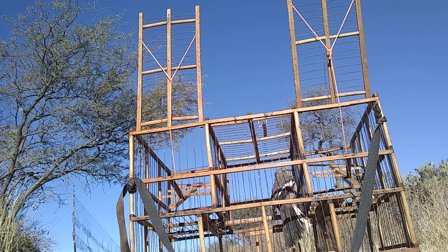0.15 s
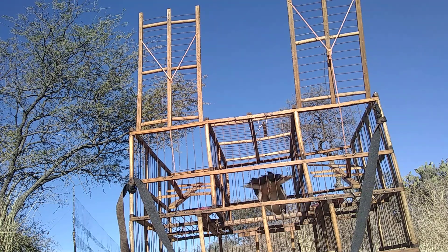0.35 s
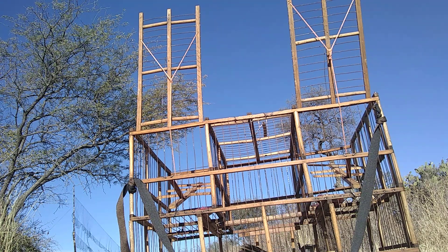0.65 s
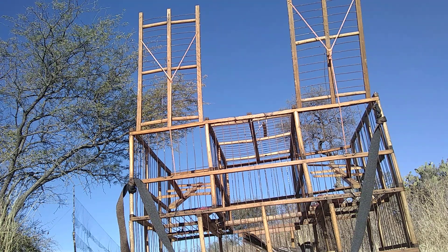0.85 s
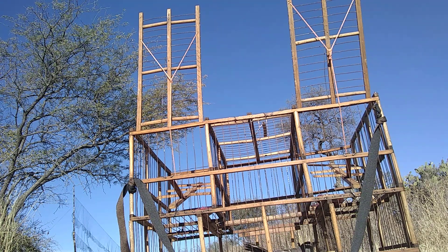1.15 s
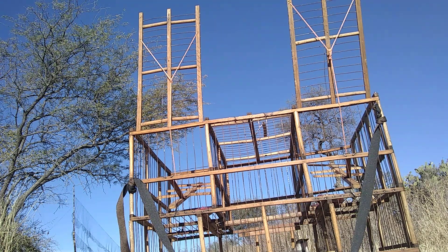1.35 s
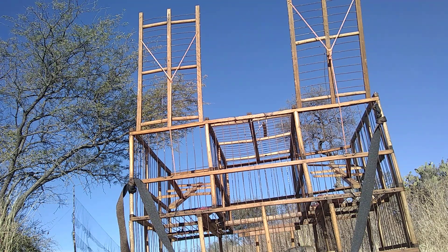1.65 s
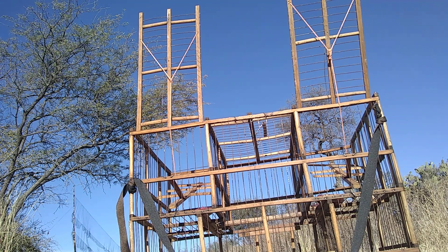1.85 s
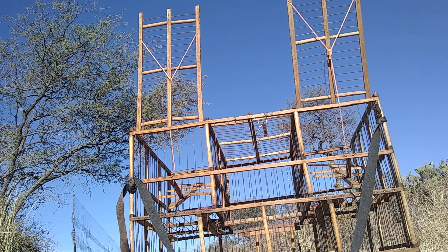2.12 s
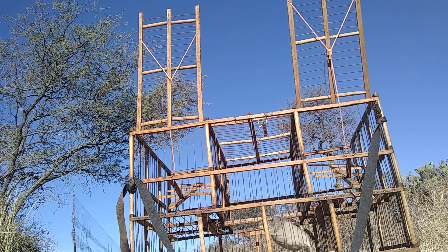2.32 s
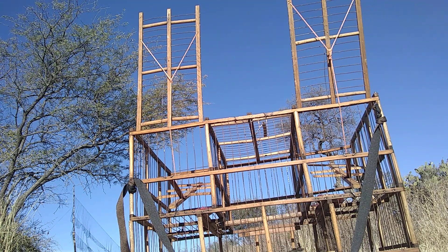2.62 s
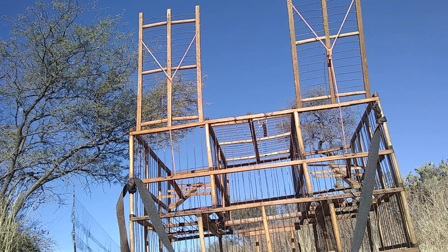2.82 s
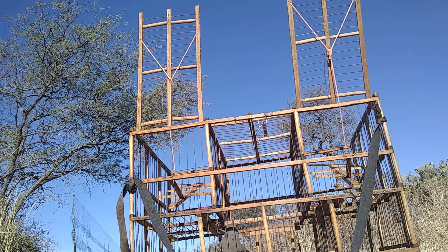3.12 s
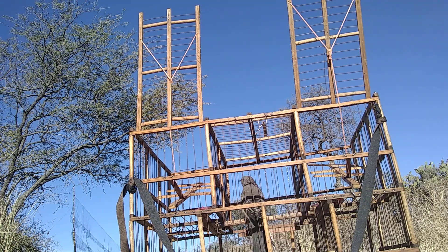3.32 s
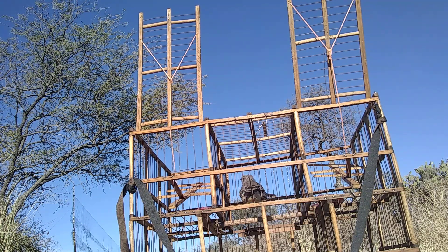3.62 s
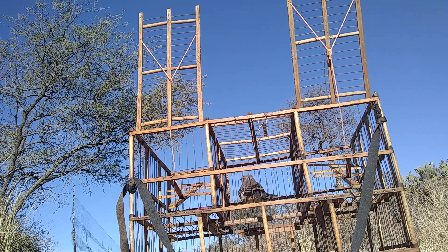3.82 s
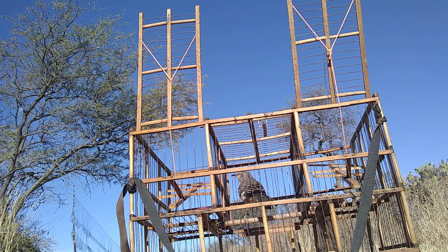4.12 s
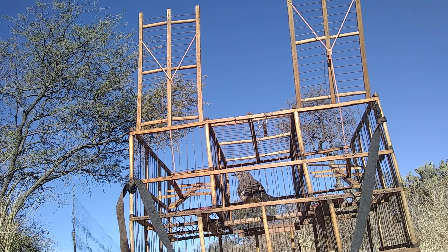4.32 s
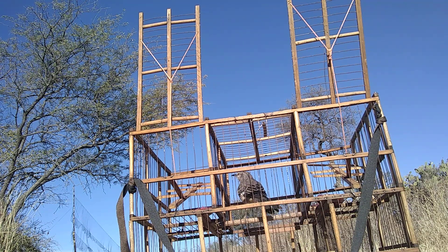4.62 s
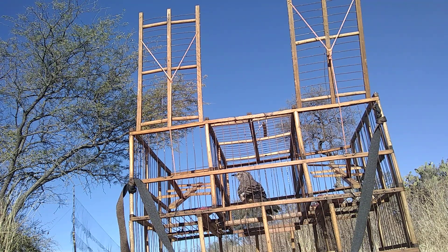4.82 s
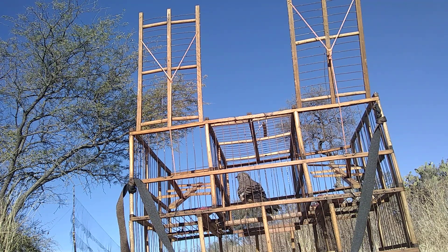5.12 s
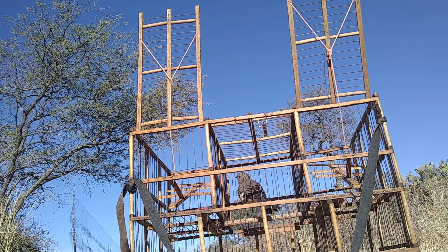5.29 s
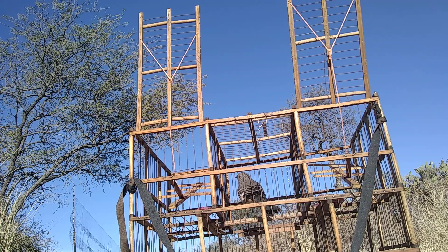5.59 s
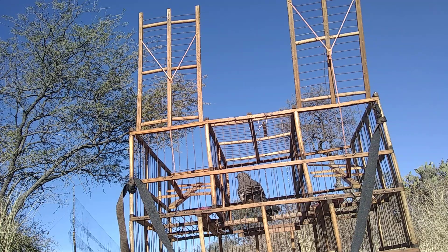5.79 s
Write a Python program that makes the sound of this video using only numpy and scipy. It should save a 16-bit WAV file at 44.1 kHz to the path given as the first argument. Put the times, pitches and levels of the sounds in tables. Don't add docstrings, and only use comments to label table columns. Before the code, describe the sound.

Outdoors, a near bird chirps, warbles and trills in repeated phrases; afterwards a fainter bird replies from the right over a faint hush.

```python
import sys
import numpy as np
from scipy import signal
from scipy.fft import rfft, irfft, next_fast_len
from scipy.io import wavfile
from scipy.ndimage import uniform_filter1d, map_coordinates

SR = 44100
rng = np.random.default_rng(int(sys.argv[2]) if len(sys.argv) > 2 else 0)


def gain_from_db(level_db):
    decades = np.asarray(level_db, float) / 20
    return 10 ** decades


def log_audio(samples):
    frames = np.atleast_2d(samples).T
    limited = np.clip(frames, -1, 1)
    pcm = np.round(limited * 32767).astype(np.int16)
    wavfile.write(sys.argv[1], SR, pcm)


N = 262395

# (frequency [Hz], density [dB per Hz])
HUSH_COLOUR = [(25, -34.5), (55, -8), (90, 6.5), (150, 1.5), (400, -0.5), (700, -12.5), (1500, -19.5),
               (3000, -20.5), (6000, -21), (12000, -26), (14100, -28), (15000, -31.5)]
# (time [s], level [dB])
HUSH_LEVEL = [(0, -55), (2, -55), (3.5, -55), (4.5, -56.5), (6, -58)]
# (frequency [Hz], likeness [0-1])
HUSH_SHARED = [(30, .9), (125, .8), (250, .8), (500, .57), (1200, .25), (2500, 0)]

NEAR_TONES = [-22.5, -36, -51, -40, -49.5]
FAR_TONES = [-41, -36.5, -45.5, -35.5, -60]
LOW_TONES = [-44, -40]
# (frequency [Hz], gain [dB])
OPEN_THROAT = [(1000, 0), (9000, 0)]
# (frequency [Hz], gain [dB])
WARBLE_THROAT = [(4000, 0), (6000, 6), (6900, -1)]
# (frequency [Hz], gain [dB])
TRILL_THROAT = [(2300, 11.5), (2900, 4.5), (3500, -5), (4800, 4.5), (5500, -8.5)]
# (frequency [Hz], gain [dB])
FAR_THROAT = [(4000, 0), (6000, 2), (7500, 3), (10000, 3.5), (12500, -21)]
# (frequency [Hz], level [dB])
RASP_COLOUR = [(500, -20), (900, -11.5), (1500, 0), (2500, 9.5), (4000, -12.5), (8000, -16.5),
               (12600, -23.5), (13900, -5.5)]
# (frequency [Hz], level [dB])
SNAP_COLOUR = [(700, -23.5), (1500, -2), (3000, 10), (5500, -1), (7000, -11.5), (11000, -20.5)]
# (frequency [Hz], level [dB])
PUFF_COLOUR = [(500, -15), (900, -2.5), (1500, -5), (2600, -12), (3500, -31)]

# (crest time [s], level [dB], flick level [dB], tail gain [dB])
CHIPS = [
    (.025, -27.5, -28, 1.5),
    (0.323, -21, -29.5, -6.5),
    (0.631, -33.5, -27.5, 8.5),
    (0.9675, -24.5, -28, 0),
]
# (time from chip start [s], pitch [Hz], level below the start [dB])
CHIP_FLICK = [(-.012, 1104, -47.5), (-.006, 1910, -8.5), (-.003, 2390, -9.5)]
# (time after crest [s], pitch [Hz], level [dB])
CHIP_DROP = [(0, 3140, 4), (.004, 2820, -2.5), (0.011, 2720, 3.5), (0.018, 2630, -7), (0.024, 2600, -20),
             (0.027, 2360, -26)]
# (first crest [s], glide start [s], end [s], first beat [ms], growth of each beat [ratio])
WARBLES = [(.0785, .188, .240, 7., 1.08), (.3835, .494, .552, 7.3, 1.07), (.699, .803, .866, 6.5, 1.12)]
# (loudest beat [dB], glide [dB], break between beats [dB], overtone gain [dB], start swell [dB])
WARBLE_VOICES = [(-36, -32.5, 6.5, -6.5, -10.5), (-28.5, -29.5, 10, 4, -23.5), (-26, -26, 10, -9.5, -25.5)]
# (share of its length [0-1], pitch [Hz], level [dB])
WARBLE_GLIDE = [(0, 3287, -1.5), (.11, 3306, -1.5), (0.269, 2988, -0.2), (.55, 2677, -0.8),
                (0.798, 2470, -3), (.95, 2515, -10), (1, 2267, -17.5)]
# (time [s], level [dB])
HOPS = [(0.606, -66), (0.944, -61), (1.585, -66), (3.225, -71), (3.399, -68.5)]
# (frequency [Hz], width [Hz], level [dB])
CAGE_RINGS = [(1610, 270, 11), (3180, 730, 9.5), (5250, 1400, 3)]
# (start [s], end [s], pitch [Hz], level [dB])
LOW_NOTES = [(1.831, 1.891, 1793, -22.5), (2.097, 2.155, 1780, -19), (2.387, 2.447, 1763, -22.5),
             (2.712, 2.775, 1800, -22.5)]
# (start [s], end [s], pitch [Hz], level [dB])
HIGH_NOTES = [(1.822, 1.86, 2080, -34.5), (2.096, 2.141, 2060, -24), (2.385, 2.443, 2065, -24),
              (2.716, 2.747, 2073, -23.5)]
# (time [s], level [dB])
CLIMBS = [(2.146, -42), (2.442, -41), (2.772, -35)]
# (time from its start [s], pitch [Hz], level [dB])
CLIMB_SHAPE = [(0, 2158, -7.5), (.009, 2653, -5.5), (0.018, 2880, -4.2)]
# (first crest [s], end [s], first beat [ms], growth of each beat [ratio], held beat [ms])
TRILLS = [(1.9015, 2.048, 5.4, 1.48, 20.9), (2.168, 2.320, 5.5, 1.45, 20.),
          (2.4607, 2.643, 6.5, 1.32, 20.6), (2.7927, 2.971, 6.7, 1.38, 20.3)]
# (top pitch [Hz], loudest beat [dB], overtone gain [dB], tiring [dB])
TRILL_VOICES = [(3590, -17.5, -4.5, -1), (3620, -18, -3, -2), (3550, -21.5, -14, 1),
                (3380, -18.5, -4, -5.5)]
# (time [s], lag of the right port [ms])
NEAR_LAG = [(0, 0.0088), (.1, 0.059), (.7, 0.059), (2.1, .08), (2.4, 0.073), (2.55, -0.029), (2.9, -0.051)]

# (crest time [s], foot pitch [Hz], top pitch [Hz], level [dB])
FAR_FLIPS = [(3.639, 2735, 3620, -54.5), (3.673, 2870, 3250, -50), (4.423, 3070, 3560, -34),
             (4.9573, 2800, 3500, -42.5), (4.968, 2730, 3070, -46)]
# (start [s], end [s], from pitch [Hz], to pitch [Hz], level [dB])
FAR_RISES = [(3.677, 3.708, 2880, 2980, -37), (3.803, 3.837, 2390, 2350, -47.5),
             (3.845, 3.897, 2450, 3100, -33.5), (4.055, 4.077, 2750, 2910, -34),
             (4.285, 4.326, 2400, 2943, -37.5), (4.368, 4.417, 2380, 3100, -31.5),
             (4.452, 4.472, 2800, 3050, -47), (4.938, 4.966, 2650, 2860, -37.5)]
# (start [s], end [s], from pitch [Hz], to pitch [Hz], level [dB])
FAR_FALLS = [(3.648, 3.675, 2740, 2595, -44), (3.899, 3.966, 3000, 2220, -39.5),
             (4.069, 4.099, 2720, 1990, -37), (4.155, 4.193, 2360, 2290, -32),
             (4.321, 4.357, 2450, 1760, -36.5), (4.528, 4.576, 1817, 1730, -43),
             (4.567, 4.600, 2400, 1910, -35), (4.610, 4.735, 2680, 2480, -34),
             (4.765, 4.785, 2500, 2490, -58), (4.810, 4.878, 2210, 1940, -37),
             (4.877, 4.885, 1930, 1690, -44), (4.960, 4.964, 2600, 2440, -37),
             (4.975, 5.084, 2350, 1802, -38)]


def evened(x):
    return x / np.sqrt(np.mean(x ** 2) + 1e-20)


def read(points, hz):
    f, value = np.transpose(points)
    return np.interp(np.log(hz + 1), np.log(f + 1), value)


def along(points):
    return np.interp(np.arange(N) / SR, *np.transpose(points))


def coloured(x, points):
    gain = gain_from_db(read(points, np.fft.rfftfreq(x.shape[-1], 1 / SR)))
    return irfft(rfft(x) * gain, x.shape[-1])


def air(colour):
    return evened(coloured(rng.standard_normal(N), colour))


def add(mix, s, sound):
    part = mix[max(round(s * SR), 0):][:len(sound)]
    part += sound[:len(part)]


def hush():
    frames, hz = N // 256 + 5, np.fft.rfftfreq(1024, 1 / SR)
    a, b, c, d, patches = rng.standard_normal((frames, 513, 5)).T
    patches = uniform_filter1d(patches, size=10, axis=0)
    patches = evened(uniform_filter1d(patches, size=16, axis=1))
    same = read(HUSH_SHARED, hz)[:, None]
    left = a + 1j * b
    right = same * left + np.sqrt(1 - same ** 2) * (c + 1j * d)
    z = np.array([left, right]) * gain_from_db(read(HUSH_COLOUR, hz)[:, None] + 1.2 * patches)
    noise = signal.istft(z, nperseg=1024, noverlap=768)[1][:, :N]
    return gain_from_db(along(HUSH_LEVEL)) * evened(noise)


def whistle(rows, tones_db, extra_db=0., dips=(), throat=OPEN_THROAT):
    s, hz, db = np.transpose(rows)
    t = np.arange(s[0] - .003, s[-1] + .003, 1 / SR)
    step = np.interp(t, s, np.arange(len(s)))
    row = np.minimum(step.astype(int), len(s) - 2)
    part, slope = step - row, np.diff(hz)

    turning = np.r_[False, slope[1:] * slope[:-1] < 0, False]
    eased = np.where(turning[row] & turning[row + 1], .5 - .5 * np.cos(np.pi * part), part)
    pitch = uniform_filter1d(hz[row] + slope[row] * eased, size=40)
    pitch = pitch * (1 + .025 * uniform_filter1d(rng.standard_normal(len(t)), size=60))

    level_db = uniform_filter1d(np.interp(t, s, db), size=50)
    for at, width, dip_db, order in dips:
        level_db = level_db - dip_db * np.exp(-abs((t - at) / width) ** order)

    turns = 2 * np.pi * np.cumsum(pitch) / SR
    tones = np.zeros(len(t))
    for k, tone_db in enumerate(tones_db, start=2):
        gain = gain_from_db(tone_db + extra_db + read(throat, k * pitch))
        tones += gain * np.sin(k * turns) * (k * pitch < 16000)
    grain = 1 + .4 * evened(uniform_filter1d(rng.standard_normal(len(t)), size=80))
    edges = signal.windows.tukey(len(t), .008 / (t[-1] - t[0]))
    voice = gain_from_db(read(throat, pitch)) * np.sin(turns) + grain * tones
    return t[0], np.sqrt(2) * gain_from_db(level_db) * edges * voice


def chips():
    song, snaps = np.zeros((2, N))
    for crest_s, top_db, flick_db, tail_db in CHIPS:
        start_s = crest_s - .004
        flick = [(start_s + s, hz, flick_db + db) for s, hz, db in CHIP_FLICK]
        drop = [(crest_s + s, hz, top_db + db + tail_db * min(s / .01, 1)) for s, hz, db in CHIP_DROP]
        add(song, *whistle(flick + [(start_s, 2900, flick_db)] + drop, NEAR_TONES, extra_db=-7.))
        pressed = flick + [(start_s + .002, 2850, flick_db - 14)]
        add(song, *whistle([(s, 2 * hz, db - 1) for s, hz, db in pressed], []))
        add(snaps, flick[0][0], gain_from_db(flick_db - 6.5) * np.hanning(620) ** 0.5)
    return song, snaps * air(SNAP_COLOUR)


def beats(start, end, first_ms, growth, held_ms):
    length = np.minimum(first_ms * growth ** np.arange(16), held_ms) / 1000
    crest = start + np.cumsum(length) - length
    keep = crest + length / 2 < end
    return crest[keep], length[keep]


def pulsing(crest, trough, crest_hz, trough_hz, db, break_db, place, width, order):
    before = np.r_[crest[0] - .002, trough[:-1]]
    rows = [(before[0], trough_hz[0], db[0])]
    rows += list(zip(crest, crest_hz, db)) + list(zip(trough, trough_hz, db))
    rise = crest - before
    dips = list(zip(before + place * rise, width * rise, break_db, order + 0 * crest))
    return sorted(rows), dips


def warble(start, glide_s, end, first_ms, growth, top_db, glide_db, break_db, bright_db, swell_db):
    crest, length = beats(start, glide_s, first_ms, growth, held_ms=13.)
    done = (crest - start) / (glide_s - start)
    trough = np.minimum(crest + .7 * length, glide_s - .002)
    crest_hz = np.interp(done, (0, .3, 1), (3560, 3410, 3770))
    trough_hz = np.interp(done, (0, 1), (3120, 3294))
    db = top_db + swell_db * (1 - done) ** 3.57
    breaks = break_db * rng.uniform(.6, 1.7, size=16)[:len(done)]
    rows, dips = pulsing(crest, trough, crest_hz, trough_hz, db, breaks, place=.45, width=0.54, order=2)
    rows += [(glide_s + part * (end - glide_s), hz, glide_db + db) for part, hz, db in WARBLE_GLIDE]

    fits = -70 + 10 * rng.standard_normal(48)
    half = [(s, hz / 2, db - 40 * (s > glide_s - .03)) for (s, hz, _), db in zip(rows, fits)]
    under = whistle(half, [], 0., dips)[1]
    s, sound = whistle(rows, NEAR_TONES, bright_db, dips, WARBLE_THROAT)
    return s, sound + under


def hops():
    out, t = np.zeros(N), np.arange(900) / SR
    ring = sum(gain_from_db(db) * np.exp(-np.pi * width * t) * np.sin(2 * np.pi * hz * t)
               for hz, width, db in CAGE_RINGS)
    for s, db in HOPS:
        scratch = rng.standard_normal(500) * (rng.random(500) < .05) * np.hanning(500)
        add(out, s - .005, gain_from_db(db) * evened(np.convolve(scratch, ring)))
    return out


def note(start, end, hz, db):
    s = (start, start + 0.0054, (start + end) / 2, end - 0.0088, end)
    pitch = hz * np.array([1.02, .985, 1.021, .99, 1.3])
    return list(zip(s, pitch, db + np.array([-20.5, -10, 0, -10, -20.5])))


def two_voices():
    duet, puffs = np.zeros((2, N))
    calls = [note(*row) for row in LOW_NOTES + HIGH_NOTES]
    calls += [[(at + s, hz, top_db + db) for s, hz, db in CLIMB_SHAPE] for at, top_db in CLIMBS]
    for rows in calls:
        add(duet, *whistle(rows, LOW_TONES))
    swell = np.sqrt(abs(uniform_filter1d(duet ** 2, size=400)) + 1e-9)
    sum_tones = coloured(duet ** 2 / swell, [(2600, -59), (3300, -1.5)])
    for start, end, _, _ in LOW_NOTES:
        add(puffs, start - .004, gain_from_db(-47.5) * np.hanning(800))
        add(puffs, end - .006, gain_from_db(-52) * np.hanning(700))
    return duet + gain_from_db(-23) * sum_tones, puffs * air(PUFF_COLOUR)


def trill(start, end, first_ms, growth, held_ms, top_hz, top_db, bright_db, tire_db):
    crest, length = beats(start, end, first_ms, growth, held_ms)
    t, span = crest - start, end - start
    trough = np.minimum(crest + .47 * length, end - .003)
    crest_hz = np.interp(t, (0, .015, 0.4 * span, .57 * span, span), (3250, top_hz, 3310, 2980, 2592))
    lowest_hz, sag_hz_per_s = 2290, 17000
    trough_hz = np.maximum(3050 - sag_hz_per_s * (trough - start), lowest_hz)
    db = top_db - 16.5 * np.maximum(1 - t / 0.017, 0)
    db = db - 19 * (t / span) ** 2.5 + tire_db * t / span
    db = db + 1.2 * rng.standard_normal(16)[:len(t)]
    breaks = np.interp(t, (0, 0.078), (0.5, 18.5))
    rows, dips = pulsing(crest, trough, crest_hz, trough_hz, db, breaks, place=.27, width=.52, order=4)
    return whistle(rows + [(end, lowest_hz, db[-1] - 21.5)], NEAR_TONES, bright_db, dips, TRILL_THROAT)


def near_bird():
    song, snaps = chips()
    for row, voice in zip(WARBLES, WARBLE_VOICES):
        add(song, *warble(*row, *voice))
    for row, voice in zip(TRILLS, TRILL_VOICES):
        add(song, *trill(*row, *voice))
    duet, puffs = two_voices()
    song = song + duet
    effort = abs(uniform_filter1d(song ** 2, size=160)) ** 0.81
    return song + gain_from_db(-10.5) * effort * air(RASP_COLOUR) + snaps + puffs


def flip(crest_s, foot_hz, top_hz, db):
    return [(crest_s - 0.0067, foot_hz, db), (crest_s, top_hz, db), (crest_s + 0.0075, foot_hz, db - 13)]


def stroke(start, end, from_hz, to_hz, db, settle_s):
    span = end - start
    t = np.linspace(0, span, num=12)
    bend = 1.4 if settle_s < span else 1
    hz = to_hz + (from_hz - to_hz) * np.maximum(1 - t / min(settle_s, span), 0) ** bend
    rise = np.maximum(1 - t / min(0.0092, span / 3), 0)
    fall = np.maximum(1 - (span - t) / min(0.0093, span / 3), 0)
    return list(zip(start + t, hz, db - 15 * (rise + fall) - 3.5 * t / span))


def far_bird():
    song = np.zeros(N)
    calls = [stroke(*row, settle_s=1) for row in FAR_RISES]
    calls += [stroke(*row, settle_s=0.052) for row in FAR_FALLS]
    calls += [flip(*row) for row in FAR_FLIPS]
    for rows in calls:
        add(song, *whistle(rows, FAR_TONES, throat=FAR_THROAT))
    return song


def ports(x, lag_ms):
    return np.array([x, map_coordinates(x, [np.arange(N) - lag_ms * SR / 1000], order=3)])


def scrub(x, start_s, t60, slap_s, slap_db):
    t = np.arange(SR // 2) / SR
    taps = rng.standard_normal((2, len(t))) * (rng.random((2, len(t))) < .05)
    bushes = gain_from_db(-60 * t / t60) * np.clip(t / start_s, 0, 1) ** 2
    bank = gain_from_db(slap_db) * np.exp(-((t - slap_s) / 0.005) ** 2)
    tail = (taps + 0.27 * taps[::-1]) * (bushes + bank)
    return signal.fftconvolve(x[None], tail / np.linalg.norm(tail[0]), axes=1)[:, :N]


def scene():
    near, far = near_bird(), far_bird()
    near_returns = scrub(coloured(near, [(1800, -10), (2500, 0)]), .008, .22, .02, slap_db=0.)
    close = ports(near + hops(), along(NEAR_LAG)) + gain_from_db(-33) * near_returns
    far_returns = scrub(far, 0.022, 0.48, 0.062, slap_db=-5.0)
    distant = ports(far, lag_ms=-0.195) * gain_from_db([[-2.5], [.4]]) + gain_from_db(-17.5) * far_returns
    return close + distant + hush()


def low_pass(x):
    return signal.sosfilt(signal.butter(12, 14980, fs=SR, output="sos"), x)


def record(dry):
    delay_ms, feed_top_hz, edge_hz = .442, 5100, 14330
    size = next_fast_len(N + 4096)
    hz, z = np.fft.rfftfreq(size, 1 / SR), rfft(dry, size)
    feed = .86 * np.exp(-2j * np.pi * hz * delay_ms / 1000) / (1 + (hz / feed_top_hz) ** 4.8)
    band = 1 / (1 + (hz / edge_hz) ** 160)
    wide = irfft((z - feed * z[::-1]) * band, size)[:, :N]
    return low_pass(wide)


dry = scene()
out = record(dry)
log_audio(out)
```